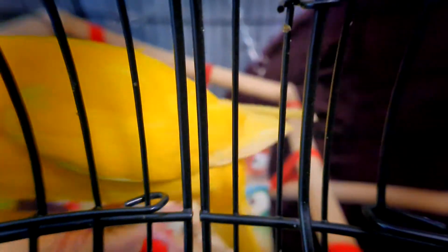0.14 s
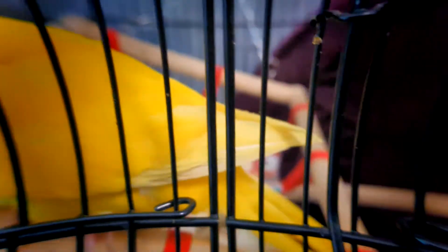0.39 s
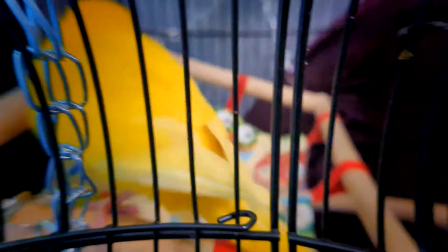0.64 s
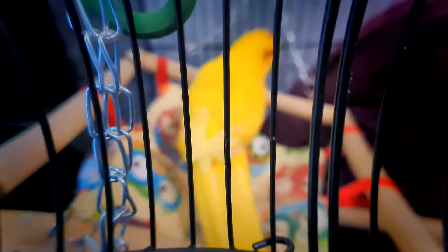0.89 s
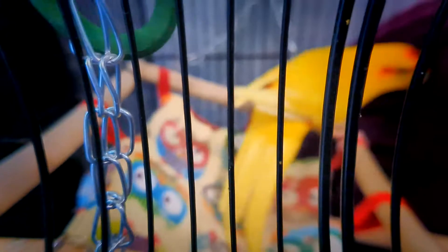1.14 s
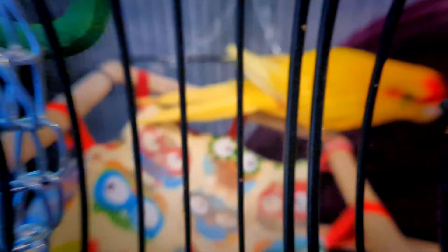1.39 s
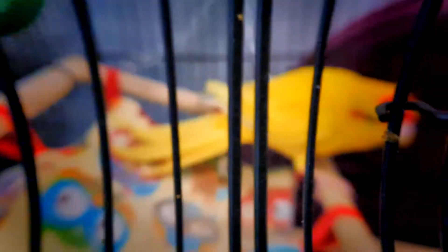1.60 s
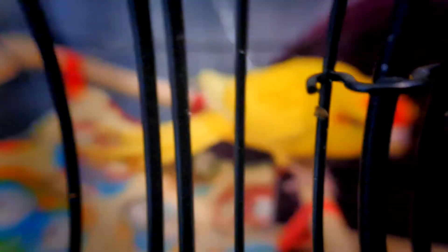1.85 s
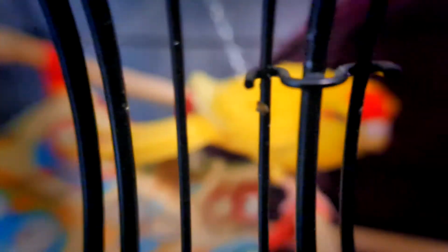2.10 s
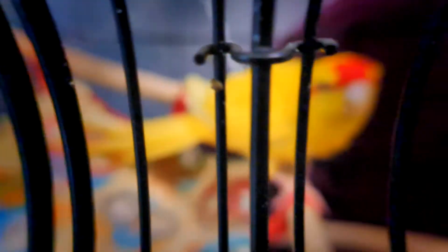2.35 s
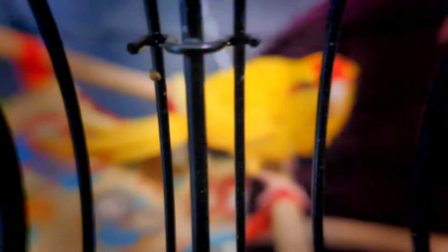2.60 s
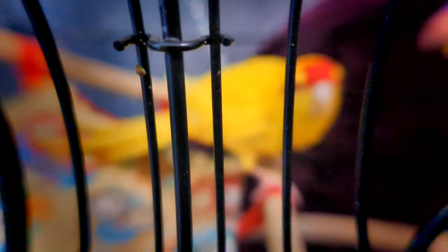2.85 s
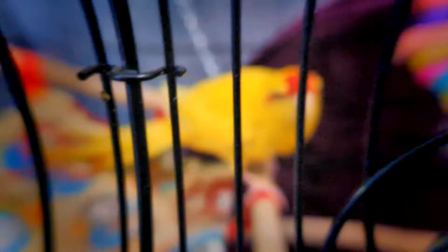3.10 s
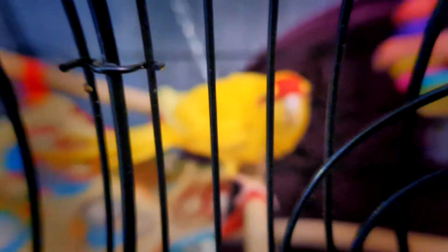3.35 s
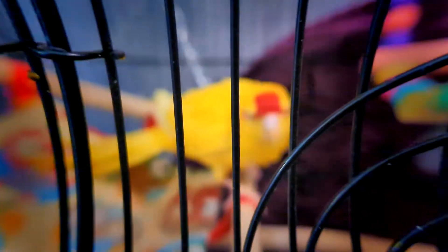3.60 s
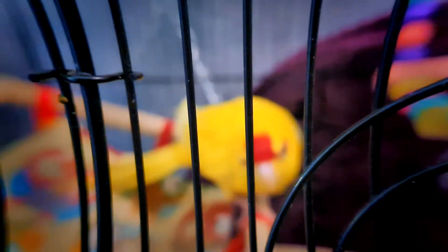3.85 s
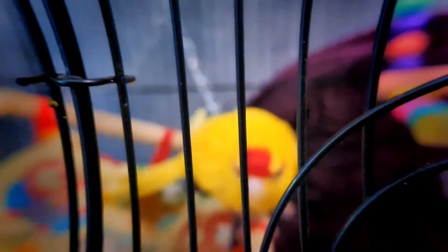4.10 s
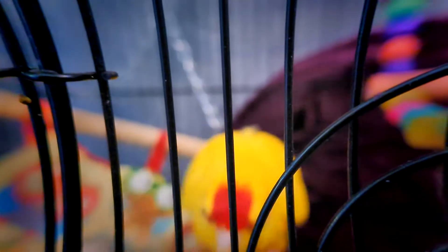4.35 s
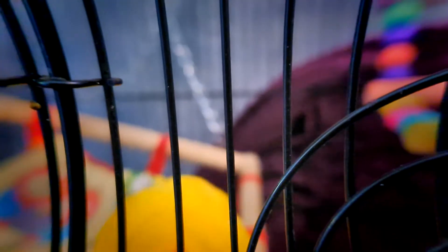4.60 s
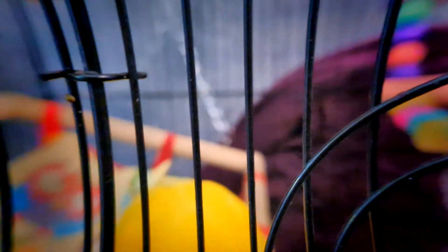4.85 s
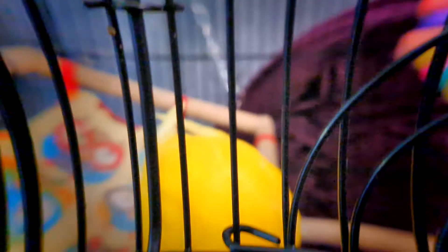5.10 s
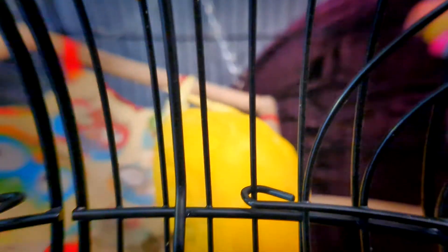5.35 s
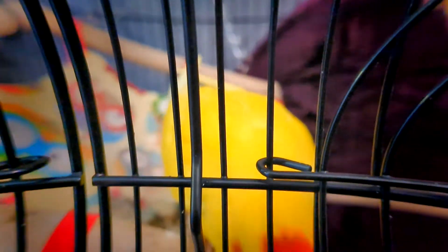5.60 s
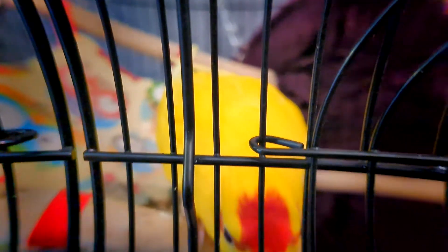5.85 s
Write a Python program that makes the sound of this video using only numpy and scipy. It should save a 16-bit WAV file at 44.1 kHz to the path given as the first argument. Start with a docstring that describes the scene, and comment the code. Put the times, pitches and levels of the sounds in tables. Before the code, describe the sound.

Quick, scratchy parrot chatter in a lively room: tumbling chirps, raspy squawks, short nasal buzzes and beak ticks over quiet appliance hum.

```python
"""Over room air, an appliance hum and hand rumble, a small parrot to one side warbles quick gliding notes.
Far cage ticks, harsh throbbing squawks, feather rustles, faint far whistles and nasal buzzes join in turn;
later come low churrs, a soft knock and bright ticks on near bars. Voices are modulated sines with overtones
and breath noise; ticks are decaying noise with a ring; air, rustle and rumble are filtered noise.
Two spaced microphones hear the bird at different moments, with early echoes and a decaying room tail."""
import sys
import numpy as np
from scipy import signal
from scipy.fft import rfft, irfft
from scipy.io import wavfile
from scipy.ndimage import uniform_filter1d, map_coordinates

SR = 44100
rng = np.random.default_rng(int(sys.argv[2]) if len(sys.argv) > 2 else 0)


def store_pcm(level_fs):
    """Save levels as 16-bit WAV."""
    pcm = np.round(np.clip(level_fs, -1, 1) * 32767).astype(np.int16)
    wavfile.write(sys.argv[1], SR, np.atleast_2d(pcm).T)


def ratio_of_db(decibels):
    """Turn decibels (scalar or array-like) into linear amplitude factors; 0 dB maps to 1."""
    return 10 ** (np.asarray(decibels, float) / 20)


N = 263718  # samples, 5.98 s


def evened(x):
    """Normalization of signal power: scales to rms 1."""
    return x / np.sqrt(np.mean(x ** 2) + 1e-20)


def read(points, hz):
    """Linear interpolation of a spectrum on a logarithmic frequency axis."""
    f, value = np.transpose(points)
    return np.interp(np.log(hz + 1), np.log(f + 1), value)


def colour(x, points):
    """Linear filtering: multiplies the spectrum of x by a response in dB."""
    response = ratio_of_db(read(points, np.fft.rfftfreq(len(x), 1 / SR)))
    return irfft(rfft(x) * response, len(x))


def add(mix, s, sound):
    """Superposition: sums a sound into the mix from time s."""
    part = mix[max(round(s * SR), 0):][:len(sound)]
    part += sound[:len(part)]


def wobble(count, span):
    """Low-pass filtered noise: a smooth random drift of rms 1 that changes over span samples."""
    return evened(uniform_filter1d(uniform_filter1d(rng.standard_normal(count), span), span))


def unfold(rows, fade):
    """Piecewise-linear control: samples the columns, held beyond both ends for a soft edge of fade seconds."""
    s, *columns = np.transpose(rows)
    t = np.arange(s[0] - fade, s[-1] + fade, 1 / SR)
    edge = np.sin(np.pi / 2 * np.clip(np.minimum(t - t[0], t[-1] - t) / (2 * fade), 0, 1)) ** 2
    return t[0], edge, [np.interp(t, s, c) for c in columns]


def drift_db():
    """Slow level modulation of the background around its mean, in dB."""
    # background level before its mean is removed: (time [s], level [dB])
    swell = [(0.0, -48.5), (1.03, -50), (1.45, -49), (2.0, -46.5), (2.23, -48.5), (3.36, -49.5),
             (3.56, -48), (5.58, -48), (5.98, -47)]
    db = np.interp(np.arange(N) / SR, *np.transpose(swell))
    return db - db.mean()


def air(bird):
    """Partly coherent diffuse noise: room air in drifting patches, plus high hiss that follows the calls' level."""
    # spectrum of the air: (frequency [Hz], relative density [dB per Hz])
    air_spectrum = [(12, -55), (60, -16), (105, -9.5), (183, -5), (489, -6), (595, -9.5), (1270, -10),
                    (1550, -11), (3390, -16.5), (4610, -14), (6110, -24.5), (7430, -20.5), (9040, -41.5),
                    (12300, -35.5), (16300, -51)]
    # likeness of the two channels: (frequency [Hz], correlation [-1 to 1])
    likeness = [(60, 0.4), (180, 0.68), (550, 0.21), (1650, -0.33), (4970, 0.19), (15000, -0.15)]
    frames, hz = N // 256 + 5, np.fft.rfftfreq(1024, 1 / SR)
    a, b, c, d, patches = rng.standard_normal((frames, 513, 5)).T
    patches = evened(uniform_filter1d(uniform_filter1d(patches, 12, 0), 14, 1))
    same = np.clip(read(likeness, hz), -1, 1)[:, None]
    left = a + 1j * b
    right = same * left + np.sqrt(1 - same ** 2) * (c + 1j * d)

    follow, follow_s, threshold_db = 0.25, 0.29, -57.5  # dB of hiss per dB of call, smoothing [s], threshold
    busy_db = 10 * np.log10(abs(uniform_filter1d(bird ** 2, round(follow_s * SR))) + 1e-12)
    busy_db = np.interp(np.arange(frames) * 256, np.arange(N), busy_db)
    follow_db = follow * np.maximum(busy_db - threshold_db, 0)
    treble = np.clip((hz - 5000) / 4000, 0, 1)[:, None]
    z = np.array([left, right]) * ratio_of_db(read(air_spectrum, hz)[:, None] + 1.7 * patches + treble * follow_db)
    hiss = signal.istft(z, nperseg=1024, noverlap=768)[1][:, :N]
    return ratio_of_db(-49 + drift_db()) * evened(hiss)


def hum():
    """Additive synthesis: mains and motor tones, each wavering in level and phase."""
    # tones: (frequency [Hz], relative level [dB])
    hum_tones = [(59.6, -61.5), (100, -53.5), (119.2, -60.5), (178.8, -62), (298, -63.5), (339, -65.5),
                 (357.6, -72.5), (417.2, -70), (476.8, -67.5)]
    t = np.arange(N) / SR
    tones = 0
    for hz, db in hum_tones:
        level = ratio_of_db(db + 1.2 * wobble(N, 4000))
        tones = tones + level * np.sin(2 * np.pi * hz * t + 0.4 * wobble(N, 4000))
    waver_db = 2.1 * drift_db() + 1.0 * wobble(N, 6000)  # background drift enlarged, plus a shared waver
    return np.sqrt(2) * tones * ratio_of_db(waver_db) * ratio_of_db([[-0.8], [0.8]])


def rumble():
    """Band-shaped noise: low lumpy rumble of the hand-held recorder, stronger on the left."""
    # course of the rumble: (time [s], relative level [dB])
    course = [(0.0, -63), (0.18, -74), (2.65, -67), (3.06, -60), (5.56, -67), (5.8, -71), (5.98, -77)]
    # spectrum of the rumble: (frequency [Hz], relative density [dB per Hz])
    hand = [(15, -20), (28, -8), (45, -8), (76, 6), (92, -18), (130, -63)]
    both, left = (evened(colour(z, hand)) for z in rng.standard_normal((2, N)))
    level = ratio_of_db(np.interp(np.arange(N) / SR, *np.transpose(course)))
    return level * np.array([both + 1.4 * left, 0.97 * both])


def note(rows, fade, waver, flutter, third_db):
    """Frequency modulation: a near sine with optional overtones, its fluttering level adding a grainy skirt."""
    s, edge, (hz, db, *octave_db) = unfold(rows, fade)
    phase = 2 * np.pi * np.cumsum(hz * (1 + waver * wobble(len(hz), 60))) / SR
    tone = np.sin(phase)
    level = np.sqrt(2) * edge * ratio_of_db(db) * (1 + flutter * wobble(len(hz), 26))
    if octave_db:
        tone = tone + ratio_of_db(octave_db[0]) * (np.sin(2 * phase) + ratio_of_db(third_db) * np.sin(3 * phase))
    return s, level * tone


def glide(s, ms, from_hz, to_hz, db):
    """Linear chirp, loudest at its low end; pitch and level set the strength of its overtones."""
    # the beak's share of the overtone at usual level: (pitch [Hz], octave relative to the note [dB])
    octave = [(1400, -11.5), (1800, -19), (2200, -10.5), (2800, -30.5), (3300, -18.5), (4000, -11.5)]
    high_end_db, octave_per_db, usual_db = -10, 0.05, -38.5
    ends = [(s, from_hz, high_end_db * (from_hz > to_hz)),
            (s + ms / 1000, to_hz, high_end_db * (to_hz >= from_hz))]
    return [(at, hz, db + less_db, read(octave, hz) + octave_per_db * (db - usual_db))
            for at, hz, less_db in ends]


def faint_chirp(rows, below_db):
    """Random fill: a faint, brief falling chirp at random pitch and delay near each note."""
    delay, start, fall = rng.random(3)
    s, hz = rows[0][0] + 0.03 * delay, 2400 + 1600 * start
    db, octave_db = max(row[2] for row in rows) + below_db, rows[0][3]
    return [(s, hz, db, octave_db), (s + 0.0082, hz * (0.627 + 0.287 * fall), db, octave_db)]


def warble(bird):
    """Syringeal phonation: a string of chirps, steadier the longer each is held, with a faint random chirp near."""
    # glides: (start [s], length [ms], from [Hz], to [Hz], relative level [dB])
    glides = [ (0.0, 9.9, 2540, 2620, -27.5), (0.013, 7.9, 3310, 3300, -26), (0.017, 8.1, 2690, 2660, -30),
              (.024, 9.5, 2286, 1800, -29.5), (.026, 4, 4000, 3820, -28), (0.037, 9, 3950, 2980, -26),
              (0.039, 5.5, 1860, 1920, -34), (.052, 6, 2880, 2270, -28.5), (0.058, 7.8, 3010, 2430, -24),
              (.076, 8, 3325, 2810, -16), (.246, 4.5, 2500, 2580, -41), (.251, 8, 2340, 1790, -42),
              (0.273, 11, 3560, 3100, -32.5), (.285, 5.1, 2795, 2510, -26.5), (.29, 11, 3460, 3280, -41),
              (0.293, 5.7, 3020, 2480, -26.5), (0.302, 15.5, 2240, 2710, -34), (.34, 17, 2240, 1840, -36.5),
              (.549, 10, 2030, 1700, -42.5), (0.569, 13, 1900, 1550, -48), (0.574, 7, 3400, 2930, -34.5),
              (.601, 13.4, 2260, 2090, -44.5), (0.676, 9.6, 2740, 2300, -40.5),
              (0.694, 15, 1970, 1830, -44.5), (.717, 4, 1510, 1940, -45), (.727, 8, 2120, 1980, -47),
              (.76, 6.2, 3360, 3360, -32), (0.771, 4, 3390, 3220, -24), (.778, 11, 3200, 3030, -31),
              (0.788, 5.8, 2450, 1950, -43), (0.795, 17, 1910, 2080, -39), (.81, 6.2, 2690, 2150, -31.5),
              (0.812, 8.5, 3300, 2540, -27), (.91, 13, 2480, 1440, -46.5), (0.922, 7, 2820, 3150, -31),
              (.94, 10.4, 1970, 1880, -43.5), (.957, 14.6, 2500, 2400, -43),
              (0.977, 22.5, 1387, 1367, -43.5), (1.106, 3, 2780, 2730, -36), (1.109, 10.5, 2650, 1670, -44),
              (1.122, 16, 3174, 3380, -29), (1.135, 16, 2444, 2457, -37), (1.149, 5.2, 2670, 2200, -39),
              (1.159, 9.1, 2460, 3100, -29), (1.178, 7.7, 1790, 1900, -41), (1.184, 5.1, 1550, 1530, -42),
              (1.193, 23, 2200, 2070, -45.5), (1.219, 10, 3500, 2980, -24), (1.244, 9, 1630, 1440, -47),
              (1.259, 3.8, 2910, 2380, -31), (1.263, 11, 2290, 1830, -36.5),
              (1.28, 15.4, 3940, 3280, -28.5), (1.302, 14, 2410, 2360, -38.5),
              (1.466, 4.4, 2680, 2400, -31.5), (1.519, 6, 1830, 1770, -40), (1.546, 6.5, 1840, 1510, -46),
              (1.618, 19, 3870, 3740, -51), (1.647, 9.7, 3490, 2820, -15), (1.664, 6.3, 3470, 3870, -19.5),
              (1.672, 12, 2360, 2280, -25), (1.68, 30, 2393, 2320, -20), (1.706, 12, 1940, 1890, -23.5),
              (1.707, 12, 3840, 3950, -25), (1.745, 35, 3756, 3850, -23.5), (1.722, 18, 4120, 3650, -16),
              (1.84, 12, 2330, 2330, -41), (1.853, 12, 2340, 1730, -41), (1.87, 10, 3420, 2800, -35),
              (1.882, 4, 2570, 2330, -33), (1.891, 11, 2670, 1990, -41), (1.905, 12, 3290, 3190, -22.5),
              (1.919, 9.5, 2630, 2350, -27), (1.929, 5, 2800, 2500, -26.5), (1.936, 8.2, 1850, 1820, -32),
              (1.953, 7.1, 1770, 1640, -43), (1.974, 15.6, 2180, 1830, -33), (1.997, 10.3, 3600, 2910, -22),
              (2.34, 13.6, 3340, 2830, -34), (2.444, 13.4, 1567, 1140, -36.5),
              (2.444, 15, 3350, 2500, -30.5), (2.587, 4.4, 2600, 2740, -35), (2.587, 8, 3170, 3200, -36),
              (2.607, 4.8, 3160, 2350, -34.5), (2.631, 6.3, 4100, 3420, -36.5),
              (2.641, 5.6, 3510, 3020, -34), (2.645, 2, 3300, 3400, -26.5), (2.65, 12, 3590, 3400, -38),
              (2.652, 11, 1960, 1360, -42.5), (2.668, 13, 3270, 1840, -34.5),
              (2.697, 7.8, 3540, 2830, -29.5), (2.811, 5.4, 1920, 1600, -42.5), (2.82, 20, 1544, 1370, -49),
              (2.837, 13, 2360, 1900, -42.5), (2.949, 6.9, 1870, 1580, -45), (2.979, 16, 2045, 2050, -46),
              (3.087, 13.5, 2020, 1630, -46), (3.407, 13, 2710, 2700, -41), (3.426, 13, 2620, 1970, -40),
              (3.441, 16, 3410, 3150, -38), (3.467, 23, 2853, 1970, -27.5), (3.492, 12, 3600, 3370, -21),
              (3.507, 8.3, 3090, 2600, -21.5), (3.519, 4, 3360, 3450, -22), (3.525, 16, 3760, 3910, -29.5),
              (3.543, 28, 3930, 3760, -27.5), (3.538, 8.1, 3430, 2080, -26), (3.546, 14, 2010, 1950, -21.5),
              (3.484, 6.7, 2100, 3600, -29), (3.562, 3.5, 2820, 3570, -18.5), (3.566, 13, 3350, 3640, -24),
              (3.592, 10, 3674, 3980, -17.5), (3.606, 13, 3700, 3810, -15), (3.615, 32, 3820, 3830, -31),
              (3.85, 11.3, 2106, 1930, -36.5), (4.139, 10.5, 3640, 2620, -37), (4.149, 15, 3820, 3560, -40),
              (4.16, 36, 2420, 2020, -29.5), (4.196, 7.4, 2510, 3160, -28.5),
              (4.216, 10.2, 3670, 3230, -20), (4.602, 20.5, 3760, 3060, -24), (4.616, 5.5, 2580, 1950, -34),
              (4.628, 29.3, 2821, 2818, -12), (4.66, 5.8, 2890, 2400, -20), (4.669, 5.8, 2490, 2460, -21),
              (4.675, 23.6, 4090, 4036, -21.5), (4.689, 4.9, 4110, 3250, -21.5),
              (4.697, 6.6, 3450, 3560, -18), (4.703, 3.1, 3420, 2970, -33), (4.712, 8, 3546, 3700, -16.5),
              (4.72, 8.5, 3080, 2720, -18), (4.737, 8.6, 3040, 2370, -27), (4.818, 10.9, 2300, 2000, -33),
              (4.834, 30, 3500, 3600, -39.5), (4.841, 12, 2025, 1954, -28.5),
              (4.862, 8.6, 2250, 1940, -27.5), (4.885, 15.4, 3070, 2900, -29.5),
              (4.897, 4, 2780, 2780, -45), (4.909, 17, 3680, 3600, -29), (4.928, 3.7, 2620, 2580, -22.5),
              (4.937, 5.8, 3090, 2660, -17), (4.951, 9.6, 2760, 2640, -22), (4.955, 13, 3540, 3540, -31),
              (4.975, 15, 3520, 3450, -35), (4.961, 7, 3320, 3380, -46), (4.975, 5, 1700, 1700, -47),
              (4.979, 10.4, 3020, 2040, -28.5), (4.987, 11.4, 2040, 2810, -27),
              (4.994, 6.7, 2230, 1930, -25), (5.008, 12, 3640, 3400, -26), (5.012, 5, 1980, 1740, -32.5),
              (5.034, 3.6, 3520, 3530, -27.5), (5.048, 5, 2950, 2600, -23.5),
              (5.053, 9.66, 2503, 1850, -29), (5.078, 10, 2100, 1940, -32), (5.062, 3.8, 1954, 2130, -22.5),
              (5.072, 9.1, 3778, 3260, -22), (5.084, 7, 3280, 3220, -34.5), (5.099, 15, 3250, 2736, -31),
              (5.533, 14, 3100, 2790, -26.5), (5.545, 5.5, 2900, 3330, -24.5),
              (5.551, 4.5, 3180, 2670, -32), (5.557, 9.6, 2350, 2040, -35), (5.567, 5.2, 2660, 2740, -27.5),
              (5.568, 10, 4050, 3520, -32), (5.578, 12, 3440, 3360, -20.5), (5.594, 4.5, 3240, 2450, -23),
              (5.602, 15.5, 4020, 3960, -31.5), (5.624, 14.6, 2583, 1826, -31.5),
              (5.627, 8.9, 3790, 3760, -32), (5.64, 5.4, 4480, 4000, -28), (5.652, 4.8, 2820, 2660, -27),
              (5.659, 15, 4075, 3170, -24.5), (5.662, 8.3, 2330, 2260, -35), (5.673, 14, 3320, 3800, -26.5),
              (5.701, 6.3, 3650, 3650, -31), (5.738, 24, 2390, 1920, -46.5), (5.772, 5.8, 3140, 2840, -28),
              (5.78, 5.4, 2400, 2670, -46), (5.789, 5.6, 2400, 2170, -41), (5.803, 14.5, 3310, 3165, -24),
              (5.819, 5.4, 3110, 2540, -29), (5.826, 4.5, 2460, 2950, -26.5), (5.827, 5, 3270, 2370, -29),
              (5.837, 7.7, 2000, 1930, -36.5), (5.858, 5, 1850, 1960, -46), (5.874, 7.6, 2355, 2060, -33),
              (5.885, 7.6, 2160, 2320, -33.5), (5.9, 9, 3600, 3130, -23.5), (5.911, 8.6, 2990, 3400, -34), ]
    for row in glides:
        unsteady = 1 / (1 + (row[1] / 20) ** 2)
        rows = glide(*row)
        fill = faint_chirp(rows, below_db=-14.5)
        add(bird, *note(rows, 0.002, waver=0.01 * unsteady, flutter=0.25 * unsteady, third_db=-17))
        add(bird, *note(fill, 0.001529, waver=0.053, flutter=0.035, third_db=-4))


def tick(s, db, hz, crack_s, ring_s, ring, low_hz, high_hz):
    """Impact excitation: a decaying crack of band-passed noise and a damped sine ring."""
    t = np.arange(2500) / SR
    band = signal.butter(3, [low_hz, high_hz], "band", fs=SR, output="sos")
    crack = signal.sosfilt(band, rng.standard_normal(len(t))) * np.exp(-t / crack_s)
    return s, ratio_of_db(db) * (crack + ring * np.sin(2 * np.pi * hz * t) * np.exp(-t / ring_s))


def far_ticks(bird):
    """Damped resonance: beak and claws strike the far cage, which shares the bird's place in the room."""
    # ticks: (time [s], relative level [dB], ring [Hz])
    ticks = [(0.0543, -25.5, 2620), (0.5927, -34, 3770), (0.9164, -41, 3010), (1.3273, -30.5, 2400),
             (1.45, -44, 2420), (1.483, -24.5, 5400), (2.4277, -29.5, 2120), (2.4362, -27, 2580),
             (3.1071, -26, 4300), (3.11, -24.5, 3870), (3.1156, -18.5, 4360), (3.1263, -24.5, 2280),
             (3.3065, -29, 2400), (3.3269, -29, 4000), (3.338, -21.5, 3970), (3.792, -35, 2030),
             (3.8006, -28, 3030), (3.8068, -27, 2200), (3.8137, -28.5, 2540), (3.825, -25, 2560),
             (5.377, -30, 2600), (5.3884, -29.5, 1880), (5.486, -39, 3040)]
    for row in ticks:
        add(bird, *tick(*row, crack_s=0.002, ring_s=0.0015, ring=0.5, low_hz=1600, high_hz=6500))


def effort(start, loudest, end, db, hz, throb_hz, end_db, octave_db, brighten_db, rough, clear):
    """Envelope control: attack, climb and release; the throb slows, and the call is roughest at its ends."""
    s = np.array([start, min(start + 0.012, loudest - 0.001), loudest, end])
    share = (s - start) / (end - start)
    level_db = db + np.array([-23, -4, 0, end_db])
    rate = throb_hz * (1 - 0.082 * (share - 0.5))
    roughness = [rough, clear, clear, rough]
    return np.transpose([s, level_db, rate, hz + 0 * s, octave_db + brighten_db * share, roughness])


def squawk(rows, rasp, swing, jitter, gap_db, top_db):
    """Periodic gating: the syrinx opens and shuts; each throb is a tone that arches up and back, plus breath."""
    s, edge, (db, rate, hz, octave_db, rough) = unfold(rows, 0.0022)
    count = len(hz)
    throb = np.cos(2 * np.pi * np.cumsum(rate * (1 + 0.0966 * wobble(count, 200))) / SR)
    arch = 0.2 + 2 * np.arcsin(throb) / np.pi  # a pointed rise and fall
    phase = 2 * np.pi * np.cumsum(hz * (1 - swing * arch + jitter * wobble(count, 30))) / SR
    tone = np.sin(phase) + ratio_of_db(octave_db) * (np.sin(2 * phase) + ratio_of_db(top_db) * np.sin(3 * phase))
    breath = evened(colour(rng.standard_normal(count), rasp))
    rough = np.clip(rough, 0, 1)
    shut = ((1 + throb) / 2) ** 3.5
    # gaps grow shallower, so that throbs run together at the end
    gate = ratio_of_db(gap_db * shut * np.linspace(1, 0.25, count) + 1.8 * wobble(count, 90))
    voice = gate * (np.sqrt(1 - rough) * evened(tone) + np.sqrt(rough) * breath)
    return s, edge * ratio_of_db(db) * evened(voice)


def squawks(bird):
    """Nonlinear vocal effort: weaker squawks throb faster, louder ones carry more overtone."""
    # squawks: (start [s], loudest [s], end [s], relative level [dB], pitch [Hz])
    calls = [(.078, 0.125, .145, -14.5, 2646), (.355, 0.381, .415, -10.5, 2810),
             (2.145, 2.199, 2.219, -12, 3053), (2.458, 2.505, 2.524, -18.5, 2972),
             (4.452, 4.487, 4.515, -12, 2822)]
    # spectrum of the breath: (frequency [Hz], relative density [dB per Hz])
    rasp = [(900, -28), (1500, -12), (2200, -2), (3500, 5.5), (5200, 5.5), (6800, 5), (8500, -2),
            (12000, -6), (16000, -19)]
    for row in calls:
        over_db = row[3] + 12.5
        rows = effort(*row, throb_hz=174.2 - 6 * over_db, end_db=-9, octave_db=6.5 + 1.24 * over_db,
                      brighten_db=10, rough=0.5, clear=0.27)
        add(bird, *squawk(rows, rasp, swing=0.27, jitter=0.06, gap_db=-21, top_db=-18))


def rustles(near):
    """Friction noise: feathers near the microphones make grainy puffs of high hiss."""
    # puffs: (start [s], length [s], relative level [dB])
    puffs = [(0.197, .03, -66), (0.906, 0.11, -65.5), (1.22, .1, -73), (3.26, 0.1, -69), (3.49, 0.053, -55),
             (3.655, .055, -61), (3.84, .07, -71), (4.657, 0.1, -58), (5.478, 0.027, -62),
             (5.63, 0.11, -68)]
    # spectrum of the hiss: (frequency [Hz], relative density [dB per Hz])
    feather = [(5000, -40), (8500, -8), (11500, 1), (14500, -4), (17000, -20)]
    for s, length, db in puffs:
        u = np.arange(0, 1, 1 / (length * SR))
        grain = ratio_of_db(3.0 * wobble(len(u), 60)) * colour(rng.standard_normal(len(u)), feather)
        add(near, s, ratio_of_db(db) * np.sin(np.pi * u ** 0.85) * evened(grain))


def whistles(far):
    """Narrow-band tones: faint far whistles slide in pitch and swell to their middle."""
    # whistles: (start [s], length [s], from [Hz], to [Hz], relative level [dB])
    slides = [(0.455, 0.11, 1250, 1355, -61), (0.671, 0.16, 1300, 1375, -59),
              (1.106, 0.117, 1250, 1346, -63), (1.57, 0.047, 1150, 1200, -59),
              (2.59, 0.077, 1104, 1183, -51), (2.705, 0.076, 1170, 1296, -53.5),
              (2.86, 0.077, 1143, 1183, -51.5), (3.0, .07, 1168, 1294, -60), (3.13, 0.1, 1290, 1204, -62)]
    ends_db = -10.5
    for s, length, from_hz, to_hz, db in slides:
        rows = [(s, from_hz, db + ends_db), (s + length / 2, (from_hz + to_hz) / 2, db),
                (s + length, to_hz, db + ends_db)]
        add(far, *note(rows, 0.01, waver=0.02, flutter=0.3, third_db=0))


def buzz(rows):
    """Source and filter: slightly uneven pulses whose overtones the beak lifts near its resonance."""
    s, edge, (db, hz, beak_hz, odd_db) = unfold(rows, 0.003)
    phase = 2 * np.pi * np.cumsum(hz * (1 + 0.006 * wobble(len(hz), 40))) / SR
    pulses = 0
    for k in range(1, 10):
        f = k * hz
        beak = 1 / (1 + ((f - beak_hz) / 1600) ** 2) ** 2
        lift = (f < SR / 2) * ratio_of_db(odd_db * (k % 2)) * (1.7 / k ** 0.93 + beak)
        lift = lift / (1 + (f / 8000) ** 6) / (1 + (1700 / f) ** 4)  # weak far above and below
        flutter = 1 + 0.35 * wobble(len(hz), 40)
        pulses = pulses + lift * flutter * np.cos(k * phase + rng.uniform(0, 1))
    return s, edge * ratio_of_db(db) * evened(pulses)


def buzzes(bird):
    """Harmonic pulse trains: level-pitched nasal buzzes with a quick rise and a slow fade."""
    # buzzes: (start [s], length [s], relative level [dB], pitch [Hz], beak resonance [Hz])
    calls = [(0.615, 0.064, -38, 1944, 3600), (1.48, 0.039, -38, 1097, 5040),
             (2.016, 0.033, -30.5, 1027, 4400), (4.311, .033, -31, 1107, 5540),
             (5.628, 0.015, -38, 987, 1000)]
    for s, length, db, hz, beak_hz in calls:
        shape = [(s, -19), (s + 0.002, 0), (s + length, -16)]
        add(bird, *buzz([(at, db + less_db, hz, beak_hz, -1.5) for at, less_db in shape]))


def churrs(bird):
    """Breath-dominated phonation: low churrs, voiced like a squawk with faster throbs and almost no overtone."""
    # churrs: (start [s], loudest [s], end [s], relative level [dB], pitch [Hz])
    calls = [(1.723, 1.73, 1.78, -19, 3324), (3.568, 3.585, 3.606, -13.5, 3494),
             (4.222, 4.258, 4.272, -26, 3080), (4.685, 4.72, 4.75, -20, 3340),
             (5.623, 5.662, 5.662, -28.5, 3300)]
    # spectrum of the breath: (frequency [Hz], relative density [dB per Hz])
    churr_rasp = [(710, -69), (1200, -32), (3150, 4), (3910, -9), (4860, -16.5), (7490, -15), (9110, -33.5),
                  (12200, -42), (16000, -48)]
    for row in calls:
        rows = effort(*row, throb_hz=223.4, end_db=-11, octave_db=-42, brighten_db=-4, rough=0.9, clear=0.12)
        add(bird, *squawk(rows, churr_rasp, swing=0.08, jitter=0.05, gap_db=-20, top_db=-12))


def thud(far):
    """Damped low resonance: a soft knock."""
    # knock: (time [s], relative level [dB], ring [Hz])
    knocks = [(2.96, -34, 280)]
    for row in knocks:
        add(far, *tick(*row, crack_s=0.0022, ring_s=0.003, ring=1.6, low_hz=150.4, high_hz=700))


def near_ticks(near):
    """Short damped resonance: bright ticks of the near bars."""
    # ticks: (time [s], relative level [dB], ring [Hz])
    ticks = [(3.0535, -50, 12000), (3.4972, -16.5, 11940), (3.7389, -41, 11600), (3.8392, -31, 11400),
             (3.8816, -42, 11050), (4.3432, -12.5, 11100)]
    for row in ticks:
        add(near, *tick(*row, crack_s=0.00025, ring_s=0.0011, ring=0.35, low_hz=6800, high_hz=16300))


def from_the_side(x):
    """Interaural-type cues: the right hears the bird later; the recorder's body shades each side differently."""
    # time by which the left hears the bird first: (time [s], lead [ms])
    lead = [(0, 0.49), (3.3, 0.47), (3.5, 1.25), (4.3, 1.37), (4.44, 0.94), (4.55, 0.54), (4.6, 1.334),
            (5.2, 1.24), (5.5, 0.46)]
    # shading of the bird: (frequency [Hz], left minus right [dB])
    shade = [(500, -16), (1300, -3), (2200, -1.5), (3500, 6.5), (5500, -12.5), (7000, 12.5), (9000, 5.5),
             (13000, 12), (16000, 12)]
    # the recorder turns: (time [s], left minus right [dB])
    turning = [(0, -4), (1, -1), (2, -1), (2.5, -1.5), (3.1, 1), (3.6, 1), (4.2, -3), (4.5, -0.5),
               (4.65, -6.5), (5, -2.5), (5.98, -2)]
    n = np.arange(N)
    late = map_coordinates(x, [n - np.interp(n / SR, *np.transpose(lead)) * SR / 1000], order=3)
    turn = ratio_of_db(np.interp(n / SR, *np.transpose(turning)) / 2)  # half of each difference to either side
    left = turn * colour(x, np.multiply(shade, [1, 0.5]))
    right = colour(late, np.multiply(shade, [1, -0.5])) / turn
    return np.array([left, right])


def echoes(x):
    """Early reflections: a dozen decaying taps in the first 35 ms, different at each microphone."""
    taps = np.zeros((2, 1600))
    at = 90 + 120 * np.arange(12) + rng.integers(0, 120, (2, 12))
    decay = ratio_of_db(-60 * at / SR / 0.08)  # falls 60 dB in 0.08 s
    np.put_along_axis(taps, at, rng.choice([-1., 1.], at.shape) * decay, 1)
    return ratio_of_db(-11) * signal.oaconvolve(x[None], taps / np.linalg.norm(taps[0]), axes=1)[:, :N]


def room(x):
    """Diffuse reverberation: sparse taps of random sign, each band dying at its own speed."""
    # reverberation time: (frequency [Hz], time to fall 60 dB [s])
    t60 = [(1500, 0.31), (3960, 0.31), (10400, 0.17)]
    taps = np.zeros((2, SR // 2))
    slots = np.arange(160, SR // 2 - 20, 16)
    at = slots + rng.integers(0, 16, (2, len(slots)))
    np.put_along_axis(taps, at, rng.choice([-1., 1.], at.shape), 1)
    hz, t, z = signal.stft(taps, SR, nperseg=256)
    tail = signal.istft(z * ratio_of_db(-60 * t / read(t60, hz)[:, None]), SR, nperseg=256)[1]
    return signal.fftconvolve(x[None], tail / np.linalg.norm(tail[0]), axes=1)[:, :N]


def scene():
    """Superposition of sources: bird and far cage share a place; the near bars are mostly dry and to the right."""
    bird, far, near = np.zeros((3, N))
    for source in (warble, far_ticks, squawks, buzzes, churrs):
        source(bird)
    for source in (whistles, thud):
        source(far)
    for source in (rustles, near_ticks):
        source(near)
    wet = room(ratio_of_db(-9) * bird + ratio_of_db(-3) * far + ratio_of_db(-8) * near)
    direct = from_the_side(bird) + ratio_of_db(1) * far + near * ratio_of_db([[-5], [4]])
    return direct + echoes(bird) + wet + air(bird) + hum() + rumble()


def band_limit(x):
    """A steep low-pass at the top of the band."""
    return signal.sosfilt(signal.butter(12, 16670, fs=SR, output="sos"), x)


def record(dry):
    """Saturation and band limiting: the converter clips near full scale, then a low-pass bounds the spectrum."""
    clipped = np.clip(dry, -0.85, 0.85)
    low_pass = signal.firwin(255, 16300, window=("kaiser", 9), fs=SR)
    finished = signal.oaconvolve(clipped, low_pass[None], "same")
    return band_limit(finished)


dry = scene()
out = record(dry)
store_pcm(out)
```